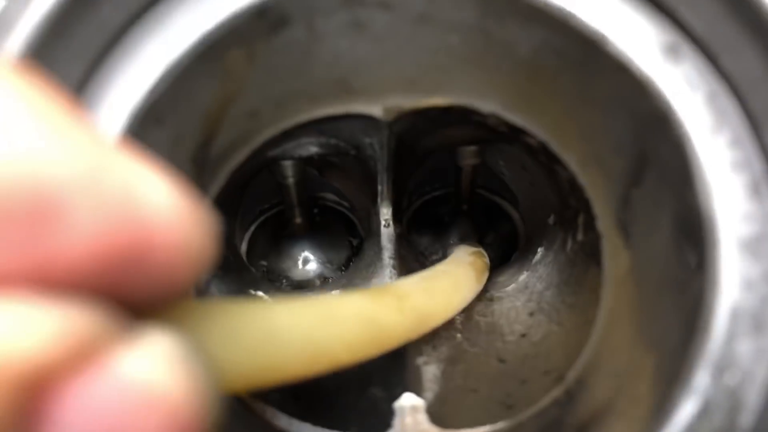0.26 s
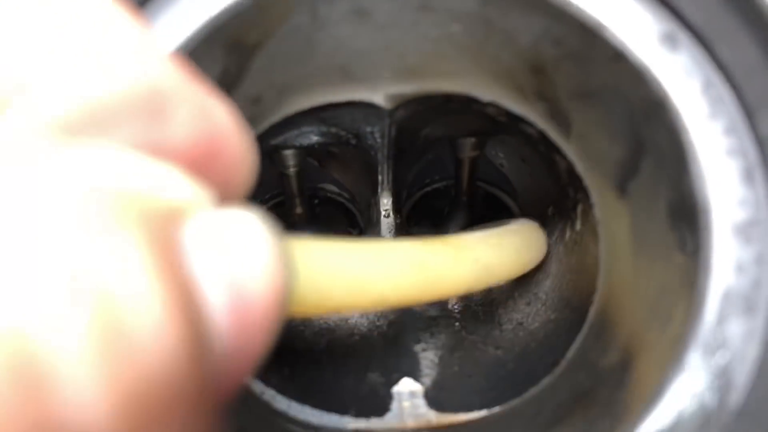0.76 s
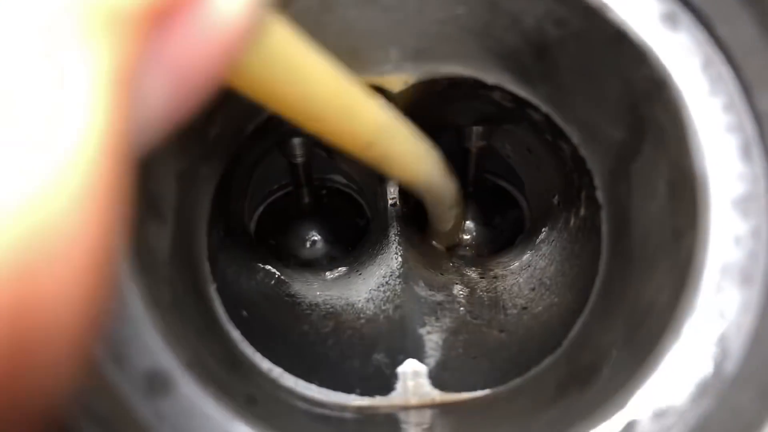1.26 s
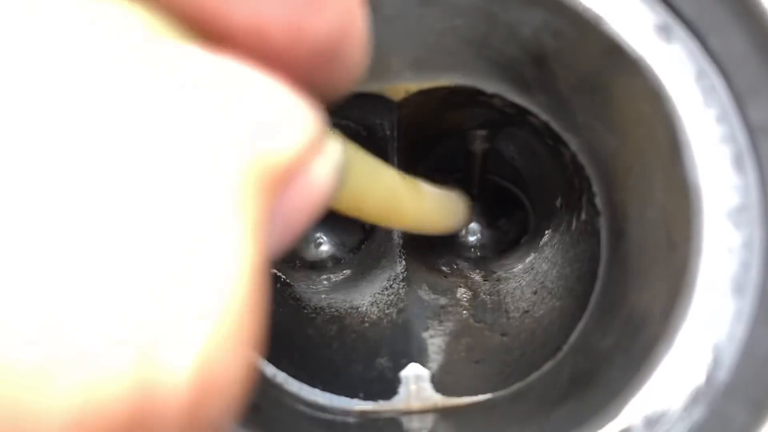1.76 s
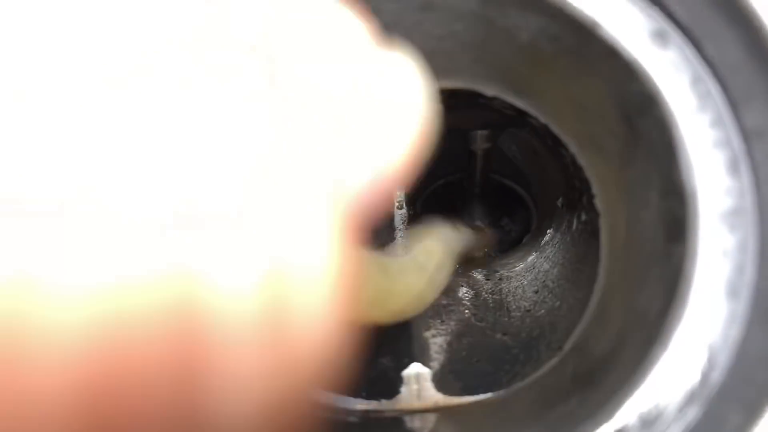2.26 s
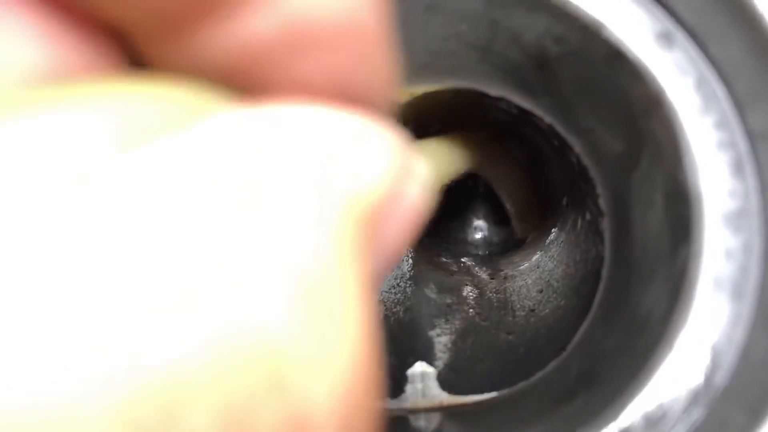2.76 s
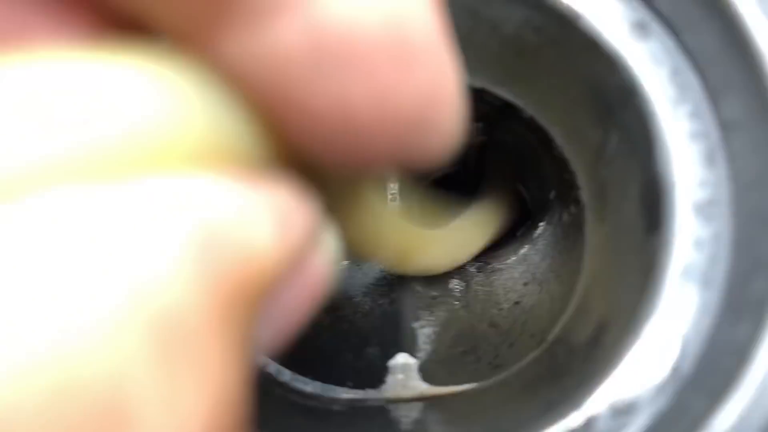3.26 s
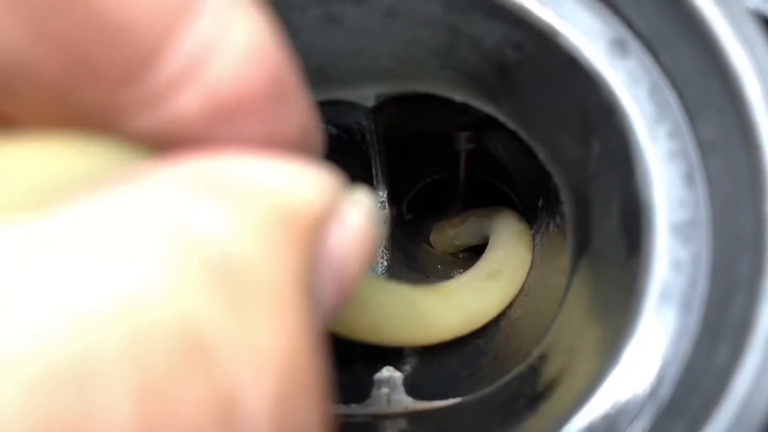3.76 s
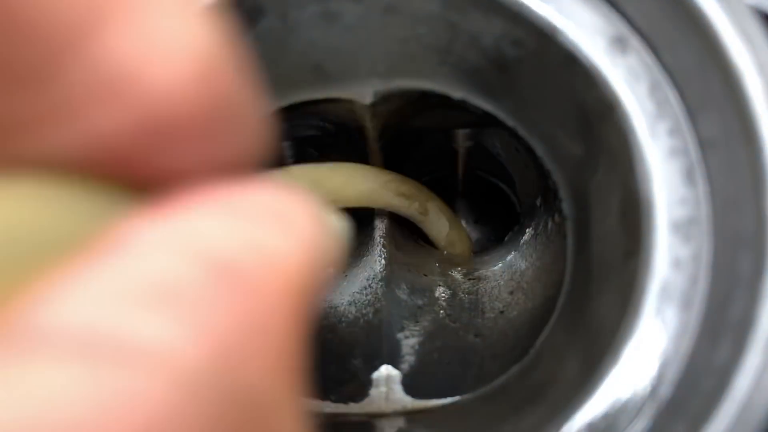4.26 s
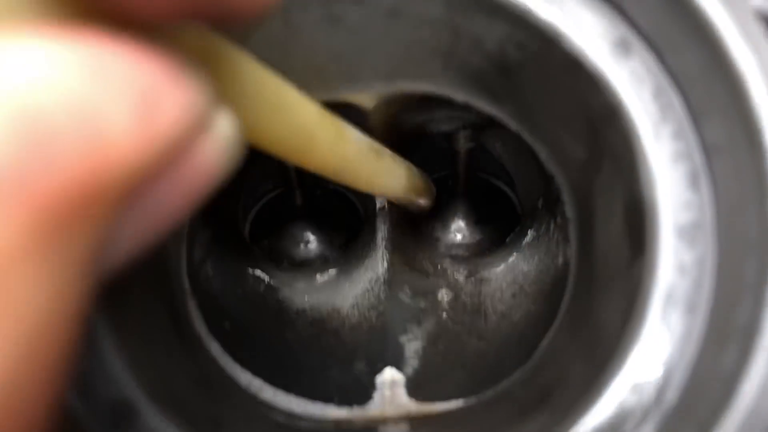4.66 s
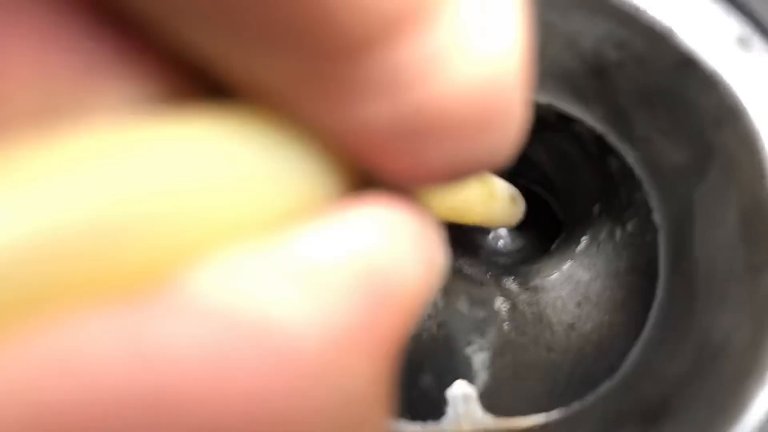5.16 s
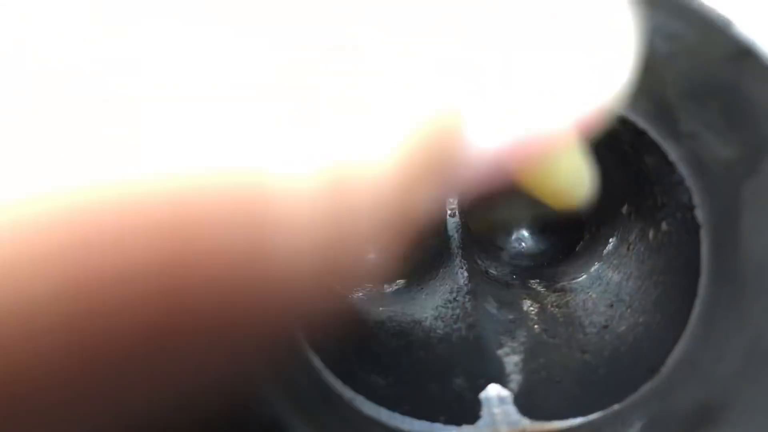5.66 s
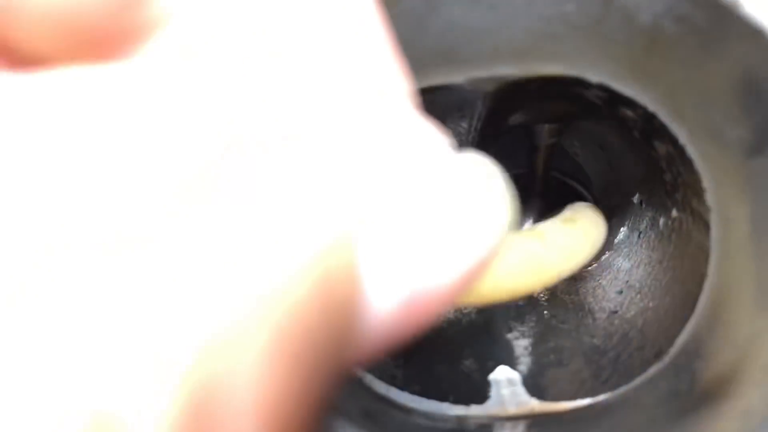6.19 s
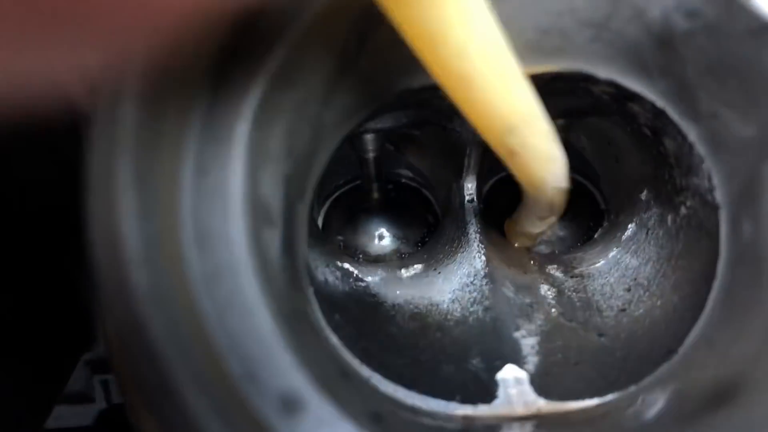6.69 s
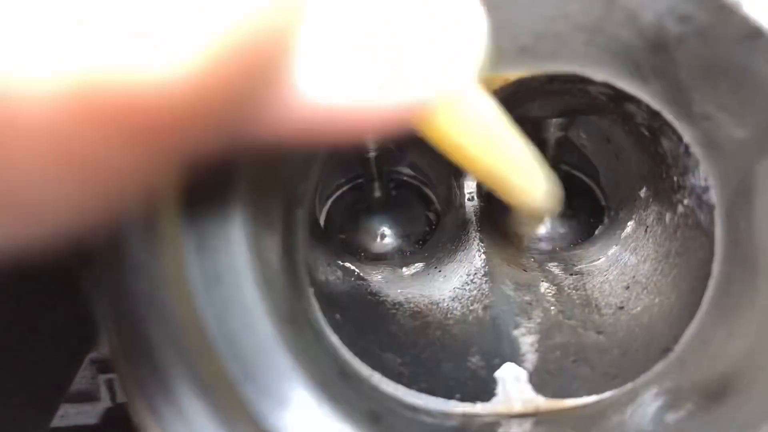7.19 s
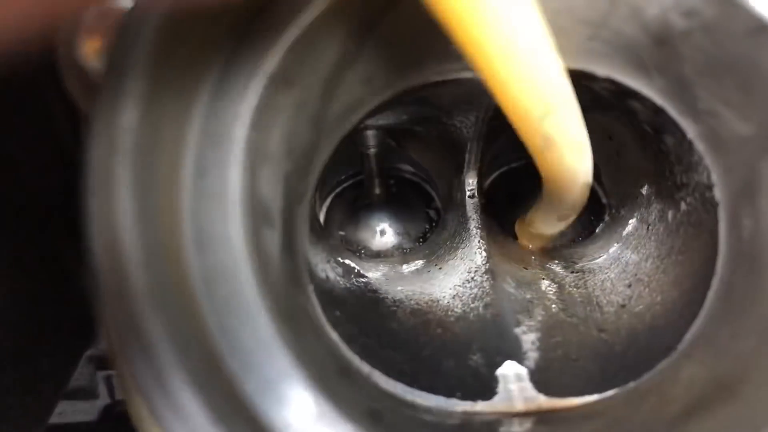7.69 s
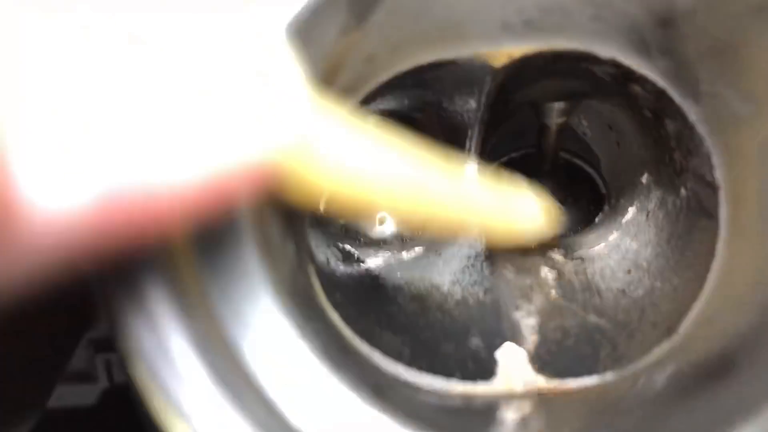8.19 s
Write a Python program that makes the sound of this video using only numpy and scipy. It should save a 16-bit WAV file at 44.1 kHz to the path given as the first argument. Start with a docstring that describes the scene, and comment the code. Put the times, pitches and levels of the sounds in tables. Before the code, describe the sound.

A hose tip sucks air and cleaning liquid inside an engine intake port. The hiss never stops; a hollow mid-pitched pipe note swells and fades beneath it. Clusters of rasping slurps and squeals come in the first second, then around two to five seconds, with a strong squeal past six. Later it is mostly dry hiss. Close handheld mono microphone, dull finger thuds, short metallic echoes, distant motor drone.

```python
"""A thin vacuum hose works inside the intake port of an engine, right under a handheld camera, for 8.4 s.
From the start air hisses into the tip and sounds the port like a short closed pipe, while the vacuum drones
further off; both are shaped noise. From about 0.5 s dips into cleaning liquid slurp, squeal and spray, made
of choppy noise, and brief whistles are narrow noise. From 1.9 to 3.3 s fingers rub the camera (low noise)
and bump it (short thuds). The longest dip starts at 5.1 s; other long ones come at 3.0, 4.3 and 6.2 s."""
import sys
import numpy as np
from scipy import signal
from scipy.fft import rfft, irfft, next_fast_len
from scipy.io import wavfile
from scipy.ndimage import map_coordinates

SR = 44100
rng = np.random.default_rng(int(sys.argv[2]) if len(sys.argv) > 2 else 0)


def generate_wav(sig):
    """Save sig (samples, or channels by samples) to the path in sys.argv[1] as 16-bit PCM at SR."""
    pcm = np.round(np.clip(np.atleast_2d(sig).T, -1, 1) * 32767).astype(np.int16)
    wavfile.write(sys.argv[1], SR, pcm)


N = 372204

# All levels are settings for the mix: later gains, echoes and the camera still act on them.
# air rushing into the tip: (time [s], hiss level [dB])
HISS_LEVEL = [(0, -22.5), (0.65, -21.5), (1.5, -23.5), (1.9, -22), (2.8, -23.5), (3.8, -22), (4.8, -24),
              (5.5, -22), (5.95, -24), (6.7, -27), (7.15, -23), (7.6, -24.5), (8.44, -24)]
# the port's lowest note, loudest when the fingers leave its mouth open: (time [s], level [dB])
NOTE_LEVEL = [(0, -21), (0.2, -27), (0.9, -26), (1.3, -34), (1.7, -29.5), (1.95, -31.5), (2.53, -33),
              (2.65, -21.5), (2.85, -30.5), (3.6, -29.5), (4.2, -28), (4.55, -25), (4.75, -29), (5.65, -25),
              (6.1, -26.5), (6.85, -28.5), (7.35, -24.5), (8.44, -23.5)]
# glide of the port, which sinks as fingers shade its mouth; divided by REST_HZ: (time [s], pitch [Hz])
PORT_PITCH = [(0, 593.7), (0.75, 579.2), (1.25, 592.1), (3.5, 587.5), (5.1, 580.2), (5.55, 565.5),
              (5.9, 584), (8.44, 586)]
# close to the metal the jet sings on one resonance:
# (start [s], end [s], level [dB], pitch [Hz], width [Hz])
WHISTLES = [(0, 0.5, -32, 6560, 453), (2.06, 2.22, -25, 2750, 450), (2.72, 2.877, -25, 3740, 450),
            (2.73, 2.903, -22.5, 5550, 700), (2.74, 2.898, -27, 9600, 260), (3.037, 3.327, -27, 5560, 700),
            (4.03, 4.088, -17.5, 5450, 200), (4.275, 4.307, -15, 5570, 300), (4.311, 4.6, -28, 1670, 150.3),
            (5.25, 5.768, -35, 4714, 280), (5.268, 5.757, -32.5, 5450, 300),
            (5.282, 5.75, -34.5, 1616, 160), (6.328, 6.368, -13, 6450, 260), (7.101, 7.28, -36, 5400, 400),
            (7.277, 7.295, -27, 5560, 300), (7.278, 7.298, -26, 1700, 150)]
# the tip meets liquid: (start [s], end [s], rise [s], slurp level [dB], squeal level of the narrowed gap [dB],
# fine spray level [dB], change from start to end [dB])
LIQUID_DIPS = [(0.456, 0.75, 0.089, -26.5, -25, -36, 3.5), (0.722, 0.8, 0.036, -19, -17, -32, 2),
               (0.8, 0.97, 0.015, -20, -18.5, -35, 0), (0.964, 1.006, 0.025, -14.5, -14, -18, -1.5),
               (1.007, 1.058, 0.01, -25, -14, -13.5, 5), (1.072, 1.088, 0.0072, -13.5, -23, -13.5, -5.5),
               (1.62, 1.78, 0.04, -30.5, -34, -41, -10), (1.985, 2.217, 0.12, -13.5, -18.5, -22, -3.5),
               (2.339, 2.35, 0.006, -14.5, -17, -11.5, -2), (2.562, 2.702, 0.024, -24, -27, -28, 3),
               (2.674, 2.91, 0.056, -19, -33, -24.5, -6.5), (2.997, 3.32, 0.055, -22.5, -31, -25, 0.5),
               (3.528, 3.549, 0.0089, -12.5, -15, -24, -9), (3.547, 3.574, 0.012, -23, -17, -13.5, 4),
               (3.635, 3.717, 0.03, -31, -29, -33, -8), (3.992, 4.084, 0.025, -21, -21.5, -20, 0),
               (4.052, 4.067, 0.006, -17, -14.5, -24, 0), (4.275, 4.31, 0.0037, -15, -22, -21, 2),
               (4.298, 4.65, 0.019, -15, -18, -19, -9), (4.655, 4.691, 0.015, -19, -18, -14, 1.5),
               (5.098, 5.76, 0.17, -30.5, -45, -47, 1), (5.782, 5.791, 0.007, -24, -23, -33, -2),
               (6.188, 6.25, 0.015, -23, -23, -21, -2), (6.243, 6.545, 0.003, -22.5, -12.5, -20, -5),
               (6.546, 6.599, 0.036, -19.5, -20, -20, -1.5), (7.08, 7.12, 0.015, -32, -31, -40, 0),
               (7.275, 7.289, 0.004, -24.5, -28, -28, -8)]
# the thin film that is always drawn in: (slurp level [dB], squeal level [dB], spray level [dB])
FILM_LEVELS = [-37, -38, -46]
# the tip nearly seals and chokes the port's note: (start [s], end [s], depth [dB])
SEALS = [(0.995, 1.066, 17), (3.033, 3.235, 5), (6.254, 6.575, 8.5)]
# fingers dragging over the camera: (start [s], end [s], level [dB])
FINGER_RUBS = [(1.891, 1.925, -33), (1.978, 2.07, -30), (2.104, 2.232, -33.5), (2.425, 2.711, -34.5),
               (2.873, 2.92, -34), (3.01, 3.088, -33), (3.255, 3.33, -28)]
# fingers bumping the camera: (time [s], peak of the swell [dB], pitch [Hz])
FINGER_BUMPS = [(1.997, -24, 190.6), (2.034, -23, 170), (2.22, -25, 150), (2.441, -24, 109.5),
                (2.49, -24, 140), (2.53, -22, 160), (2.576, -15, 271), (2.68, -5.5, 304), (2.693, -18, 115),
                (2.702, -16, 171), (2.9, -13.5, 210.2), (2.91, -19, 192.6), (3.027, -18, 159.8),
                (3.071, -20.5, 200), (3.263, -23, 99.7), (3.305, -27, 150.2)]
# the vacuum's far drone: (time [s], level [dB])
DRONE_LEVEL = [(0, -39.8), (3.2, -39.3), (4.6, -40.3), (5.8, -38.3), (6.6, -41), (7.3, -38.8),
               (8.44, -38.8)]

# Resonances, before any glide; their levels only count against each other: (centre [Hz], width [Hz], level [dB])
# the open port's note
PORT_NOTE = [(581.4, 32, 2.5)]
# a second, broad pass that steepens the sides of the note
NOTE_SKIRT = [(613, 1100, 0)]
# the overtone and low body that come with the note
PORT_BODY = [(333, 220, -1), (1160, 320, -3.5), (1665, 164, 1.5)]
# the port stirred by dry air
DRY_RESONANCES = [(1634, 135, -3), (2370, 210, -7), (2720, 720, -18), (3800, 220, -9), (4685, 200, -4),
                  (5780, 440, -4), (6440, 260, -5.5), (8750, 290, -9), (9700, 450, -7.5), (11350, 500, 0),
                  (12660, 420, -4.5)]
# the port rattled by liquid
WET_RESONANCES = [(570, 36, -0.5), (1634, 90, 0.5), (2783, 385, -3), (3800, 254, -4), (4480, 133, -4),
                  (5420, 185, 0.5), (6300, 690, -9.5), (7250, 460, -5), (9720, 320, -3.5),
                  (11500, 350, -14), (15500, 600, -20)]
# the narrowed gap at the tip
GAP_RESONANCES = [(3710, 200, -9.5), (6416, 224, 8.5), (7330, 500, -4.5), (9530, 470, -8)]
# low boom of the room
ROOM_BOOM = [(83, 18, 0)]

# Broad noise colours, also only relative: (frequency [Hz], level [dB per Hz])
# hissing jet of air
JET_COLOUR = [(300, -22), (800, -7.5), (2000, -13.5), (4100, -8.5), (5200, -4.5), (7200, -2), (8200, -2),
              (10500, -2.5), (12000, -0.5), (13500, -2.5), (15700, -5)]
# splashing liquid
SPLASH_COLOUR = [(150, -41), (500, -11), (1100, 5.5), (3000, -7.5), (7000, 12.5), (8500, -7), (12000, -12),
                 (15700, -6)]
# fine spray
SPRAY_COLOUR = [(2000, -32), (5000, -12), (7300, 6.5), (8400, -4), (9700, 7), (10700, -0.5), (11600, 4),
                (14000, -2.5), (15700, -5)]
# skin on the camera body
SKIN_COLOUR = [(20, -14), (50, -2), (130, -2.5), (230, -8.5), (350, -18), (700, -36), (2000, -80)]
# far vacuum
DRONE_COLOUR = [(20, -30), (35, -12), (55, -2.5), (80, 4.5), (105, -0.5), (160, -1), (260, -6.5), (420, -5),
                (800, -18.5), (1400, -11.5), (4000, -27.5)]

REST_HZ = 585  # pitch at which the port's sounds are not shifted
NOTE_DRIVE_DB = -10  # the port's note, per unit of slurp
NOTE_BUILD_S = 0.017  # time constant of the note following a slurp
SEAL_S, RELEASE_S = 0.018, 0.0087  # time to seal; time constant of a dip or seal letting go
RUB_RISE_S, RUB_FALL_S = 0.016, 0.016  # rise time and time constant of the fall
JUDDER_RATE, JUDDER_DB = 50, 2  # sticking and slipping skin: random points a second, typical depth
DRONE_CHOKE = 0.34  # share of a seal's dip that the drone takes too
TOP_HZ = 15780  # the camera keeps nothing above this


def dry_air(tuning, slurp_gain, choke_db):
    """The jet hisses at the tip and blows the port's resonances; slurps blow the note harder."""
    hiss_db, = curves(HISS_LEVEL)
    note_db, = curves(NOTE_LEVEL)
    # the resonances wander as the hose moves
    hose_tuning = tuning + 0.007 * wobble(2.5)
    sung = gliding(resonate(noise(), DRY_RESONANCES), hose_tuning)
    hiss = amp(-1.0) * coloured(noise(), JET_COLOUR) + amp(-4) * sung
    note = resonate(resonate(noise(), PORT_NOTE), NOTE_SKIRT)
    body = resonate(noise(), PORT_BODY)
    hollow = gliding(note + amp(-14) * body, tuning)
    # smooth the slurp so that the note builds up gradually
    keep = np.exp(-1 / (NOTE_BUILD_S * SR))
    drive = signal.lfilter([1 - keep], [1, -keep], slurp_gain)
    blown = np.hypot(amp(note_db), amp(NOTE_DRIVE_DB) * drive) * amp(-choke_db)
    hiss_gain = amp(hiss_db + 0.33 * wobble(16))
    return hiss_gain * hiss + blown * hollow


def liquid(tuning, slurp_gain, squeal_gain, spray_gain):
    """Slugs of liquid rattle the port, make the gap squeal and break into spray."""
    gulps_db = 0.55 * wobble(45)
    pinch_db = 0.9 * wobble(22)  # the gap narrows and widens
    rattle = gliding(resonate(torn(rate=550, depth_db=2.0), WET_RESONANCES), tuning)
    splash = coloured(torn(rate=700, depth_db=2.5), SPLASH_COLOUR)
    slurp = rattle + amp(-8.5) * splash
    trembling = 1 + 0.011 * wobble(30)  # the wet gap trembles in pitch
    squeal = gliding(resonate(torn(rate=300, depth_db=1.5), GAP_RESONANCES), trembling)
    spray = coloured(torn(rate=780, depth_db=4.5), SPRAY_COLOUR)
    mix = slurp_gain * slurp + squeal_gain * amp(pinch_db) * squeal + spray_gain * spray
    return amp(gulps_db) * mix


def wetness():
    """Gains of slurp, squeal and spray: the steady film plus every dip, which swells or drains as it lasts."""
    power = np.outer(amp(FILM_LEVELS) ** 2, np.ones(N))
    for start, end, rise, slurp_db, squeal_db, spray_db, change_db in LIQUID_DIPS:
        progress = np.clip((np.arange(N) / SR - start) / (end - start), 0, 1)
        shape = gate(start, end, rise, RELEASE_S) * amp(change_db * (progress - 0.5))
        power += np.outer(amp([slurp_db, squeal_db, spray_db]) ** 2, shape ** 2)
    return np.sqrt(power)


def choking():
    """How many dB the seals take off the port's note; the drone takes a share of it."""
    return sum(depth_db * gate(start, end, SEAL_S, RELEASE_S) for start, end, depth_db in SEALS)


def whistles():
    """Breathy, narrow tones, cut from noise around one pitch, that start and stop quickly."""
    out = np.zeros(N + SR)
    for start, end, db, hz, width in WHISTLES:
        t = np.arange(max(round((end - start) * SR), 64)) / SR
        f = np.fft.rfftfreq(len(t), 1 / SR)
        peak = 1 / (1 + (2.2 * (f - hz) / width) ** 2)
        tone = unit(irfft(rfft(noise()[:len(t)]) * peak, len(t)))
        fade = np.minimum(np.minimum(t, t[::-1]) / 0.0044, 1)  # fade in and out, in seconds
        out[max(round(start * SR), 0):][:len(t)] += amp(db) * tone * fade
    return out[:N]


def walls(x, t60, wet_db, count):
    """Short metal echoes ripple the hiss; their pattern shifts as the hand moves."""
    t = np.arange(SR // 16) / SR
    place = np.linspace(0, count - 1, N)  # moves evenly from the first echo pattern to the last
    bright = filtered(x, lambda f: f ** 2 / (f ** 2 + 2600 ** 2))
    echo = np.zeros(N)
    for k in range(count):
        tail = rng.standard_normal(len(t)) * amp(-60 * t / t60) * (t > 0.001)
        near = abs(place - k) < 1
        fade = np.sqrt(1 - abs(place[near] - k))
        echo[near] += fade * signal.oaconvolve(bright[near], tail / np.linalg.norm(tail))[:len(fade)]
    return x + amp(wet_db) * echo


def fingers():
    """Skin drags over the camera body as low, juddering noise; bumps are dull, quickly dying tones."""
    drag = sum(amp(db) * gate(start, end, RUB_RISE_S, RUB_FALL_S) for start, end, db in FINGER_RUBS)
    judder = amp(JUDDER_DB * wobble(JUDDER_RATE))
    out = drag * judder * coloured(torn(rate=120, depth_db=3.0), SKIN_COLOUR)
    t = np.arange(SR // 20) / SR
    for s, db, hz in FINGER_BUMPS:
        age = t * hz / 0.3  # each bump dies within two or three cycles
        swell = age * np.exp(1 - age)
        out[round(s * SR):][:len(t)] += amp(db) * swell * np.sin(2 * np.pi * hz * t)
    return out


def workshop(choke_db):
    """The vacuum's far drone is low noise, with a low boom of the room."""
    drone_db, = curves(DRONE_LEVEL)
    drone = amp(drone_db - DRONE_CHOKE * choke_db) * coloured(noise(), DRONE_COLOUR)
    return drone + amp(-52.0) * resonate(noise(), ROOM_BOOM)


def noise():
    """White turbulence: the same strength at every pitch."""
    return rng.standard_normal(N)


def torn(rate, depth_db):
    """Turbulence chopped into uneven spurts, as when liquid tears off the tip."""
    return noise() * amp(depth_db * wobble(rate))


def coloured(x, spectrum):
    """x with a broad spectrum, at rms 1."""
    hz, db = np.transpose(spectrum)
    return unit(filtered(x, lambda f: amp(np.interp(np.log(f + 1), np.log(hz), db))))


def resonate(x, modes):
    """x through a set of resonances, at rms 1."""
    def response(f):
        """Sum of the ringing peaks; every second one is flipped in sign."""
        total = 0
        for k, (centre, width, db) in enumerate(modes):
            damping = 1j * f * width
            total = total + (-1) ** k * amp(db) * damping / (centre * centre - f * f + damping)
        return total
    return unit(filtered(x, response))


def filtered(x, response):
    """x with each frequency scaled by response(frequency)."""
    m = next_fast_len(N + 8192)
    return irfft(rfft(x, m) * response(np.fft.rfftfreq(m, 1 / SR)), m)[:N]


def gliding(x, speed):
    """Shift every frequency of x by a slowly changing factor near 1, by playing it faster or slower."""
    doubled = signal.resample_poly(x, 2, 1)  # twice the samples, for cleaner reading in between
    return map_coordinates(doubled, [2 * np.cumsum(speed)], mode="wrap")


def gate(start, end, rise, fall):
    """Straight rise, hold until the end, exponential release."""
    t = np.arange(N) / SR
    return np.clip((t - start) / rise, 0, 1) * np.exp(-np.clip((t - end) / fall, 0, 30))


def wobble(rate):
    """A smooth random curve through `rate` random points a second."""
    points = rng.standard_normal(int(N * rate / SR) + 4)
    return map_coordinates(points, [np.arange(N) * rate / SR])


def curves(rows):
    """One value per sample for each column after the time."""
    s, *cols = np.transpose(rows)
    return [np.interp(np.arange(N) / SR, s, c) for c in cols]


def amp(db):
    """Decibels to gain."""
    return 10 ** (np.asarray(db) / 20)


def unit(x):
    """Scale to rms (average strength) 1."""
    return x / np.sqrt(np.mean(x ** 2) + 1e-20)


def scene():
    """Tip, fingers and workshop reach one microphone, so both channels are the same."""
    tuning = curves(PORT_PITCH)[0] / REST_HZ
    slurp, squeal, spray = wetness()
    choke_db = choking()
    tip = dry_air(tuning, slurp, choke_db) + liquid(tuning, slurp, squeal, spray) + whistles()
    port = walls(tip, t60=0.041, wet_db=-6.5, count=7)
    mono = amp(-0.81) * port + fingers() + workshop(choke_db)
    return np.array([mono, mono])


def record(dry):
    """The camera thins the deep bass, rounds off the highest peaks and keeps nothing above its band limit."""
    thinned = signal.sosfilt(signal.butter(3, 42, "highpass", fs=SR, output="sos"), dry)
    rounded = thinned / (1 + np.abs(thinned) ** 6) ** (1 / 6)
    return np.array([filtered(channel, lambda f: f < TOP_HZ) for channel in rounded])


dry = scene()
out = record(dry)
generate_wav(out)
```